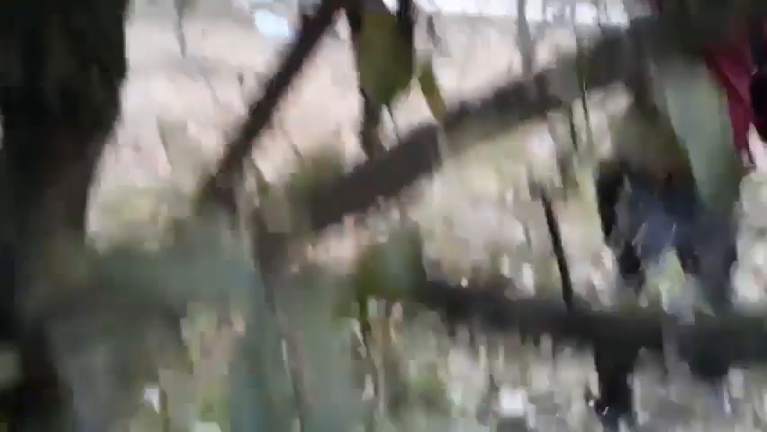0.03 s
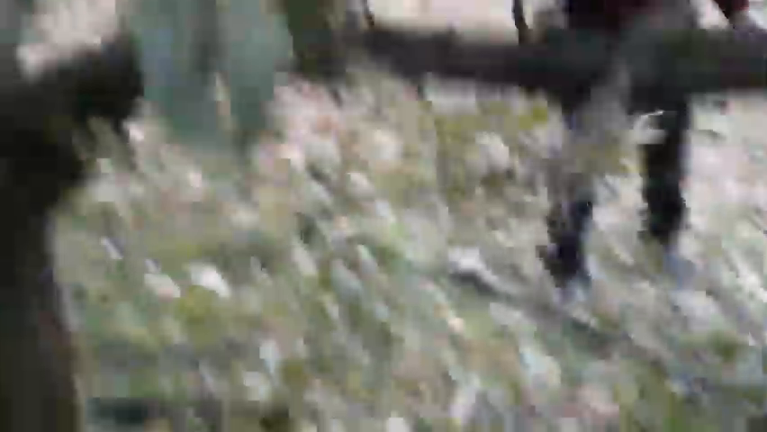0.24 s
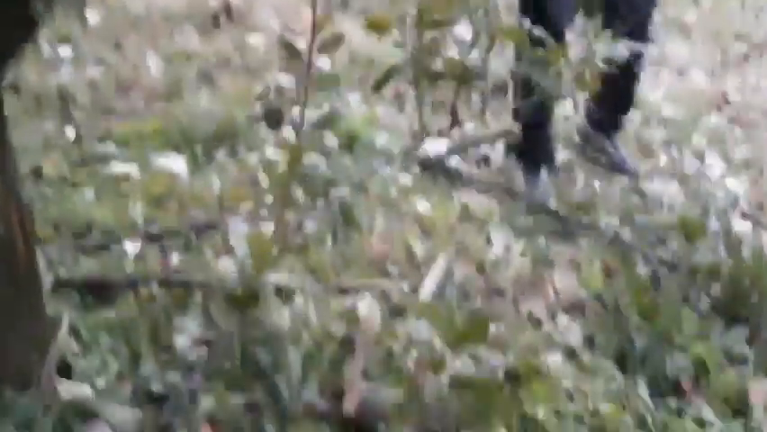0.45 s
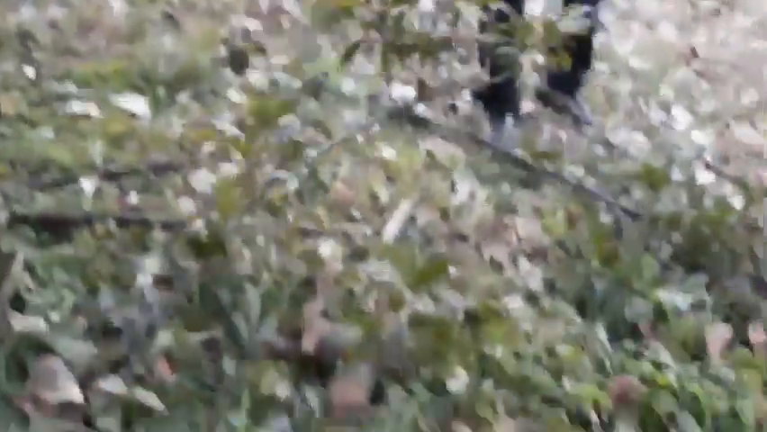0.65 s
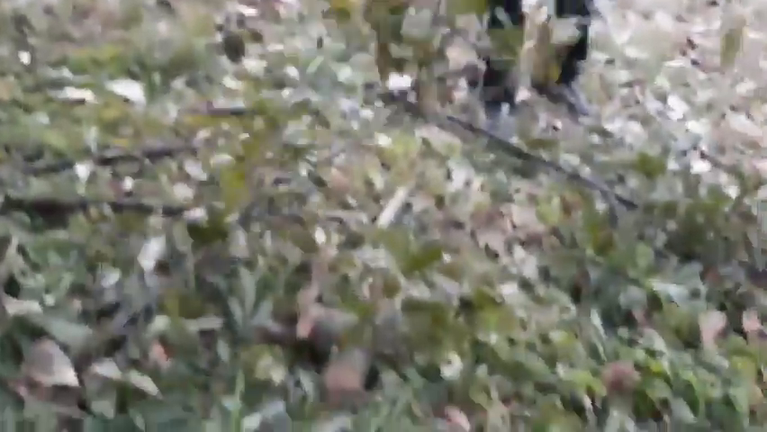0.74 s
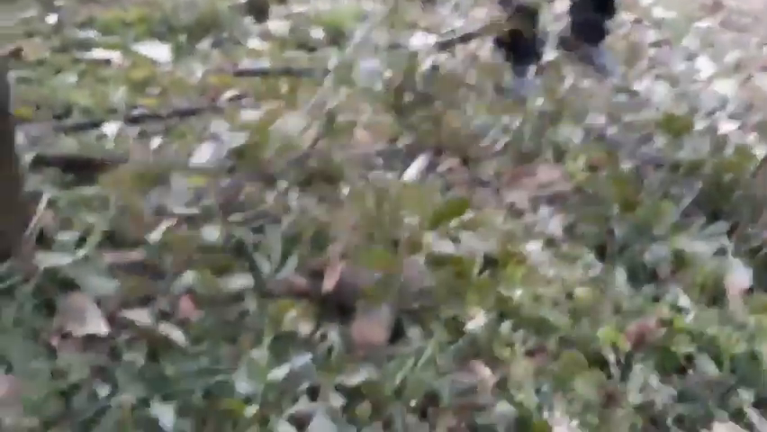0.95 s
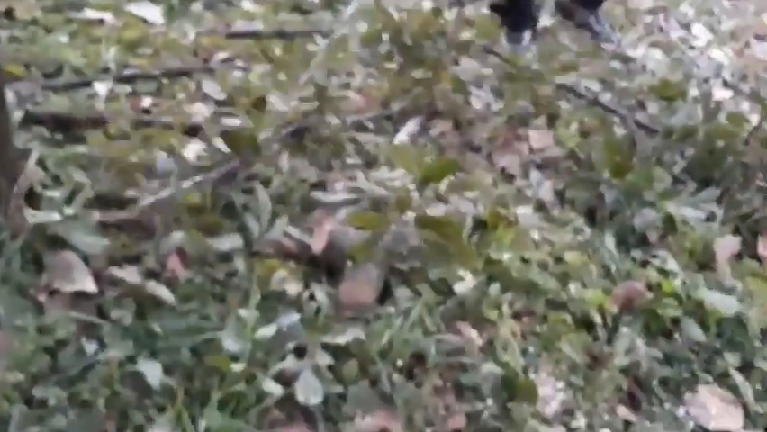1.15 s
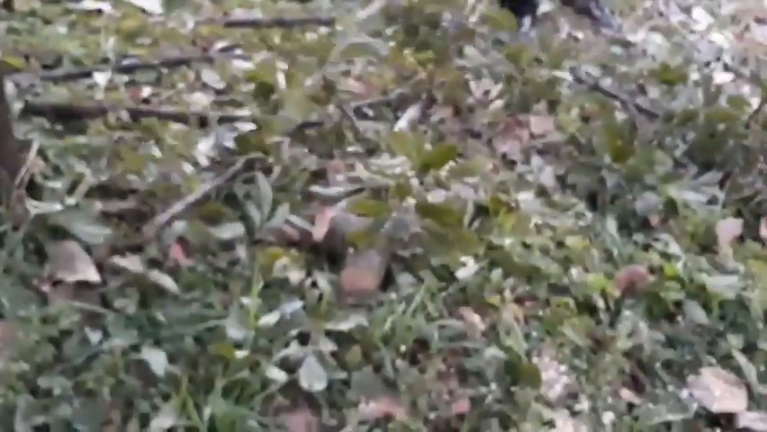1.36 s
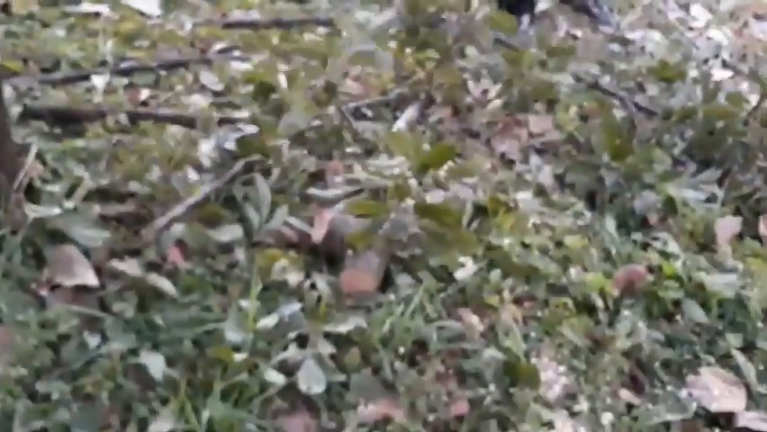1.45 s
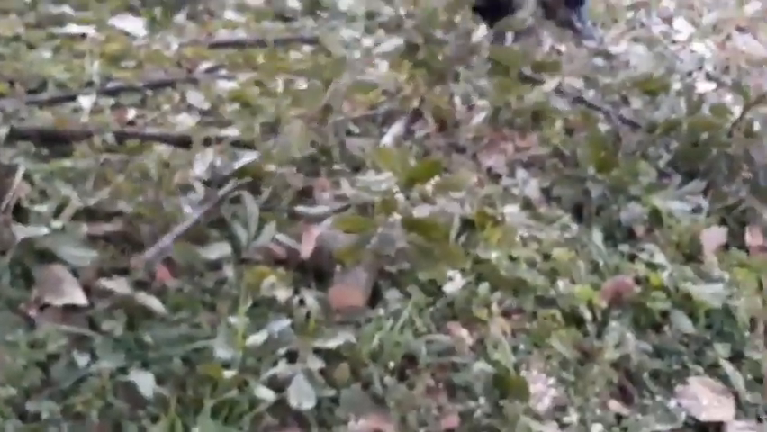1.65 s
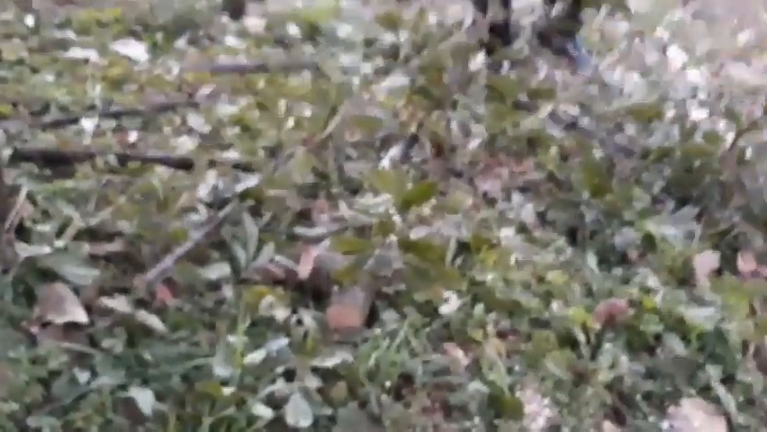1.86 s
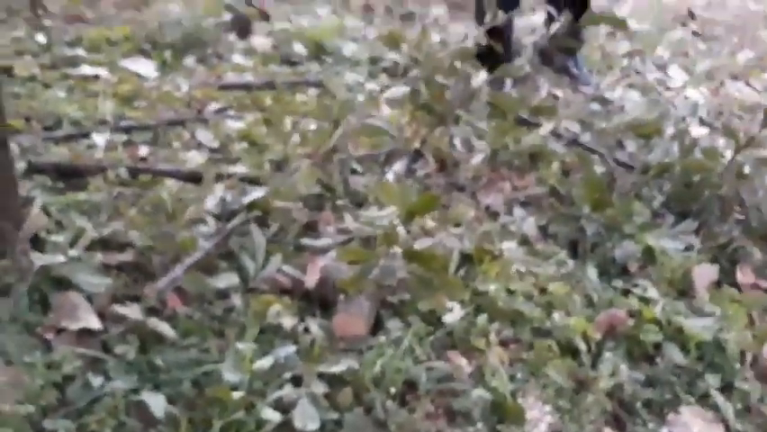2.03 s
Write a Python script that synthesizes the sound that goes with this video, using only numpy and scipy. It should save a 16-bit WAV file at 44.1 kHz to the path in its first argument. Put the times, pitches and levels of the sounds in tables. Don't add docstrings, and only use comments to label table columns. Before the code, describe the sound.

An electric chain saw clicks on, whines up, bites harshly through a branch, then winds down

```python
import sys
import numpy as np
from scipy import signal
from scipy.fft import rfft, irfft
from scipy.io import wavfile
from scipy.ndimage import uniform_filter1d

SR = 44100
rng = np.random.default_rng(int(sys.argv[2]) if len(sys.argv) > 2 else 0)


def gain_from_db(level_db):
    decades = np.asarray(level_db, float) / 20
    return 10 ** decades


def generate_wav(sig):
    pcm = np.round(np.clip(np.atleast_2d(sig).T, -1, 1) * 32767).astype(np.int16)
    wavfile.write(sys.argv[1], SR, pcm)


N = 92610
T = np.arange(N) / SR


def level(x, db):
    return x * gain_from_db(db) / np.sqrt(np.mean(x ** 2))


def band(x, hz, width_hz):
    return signal.lfilter(*signal.iirpeak(hz, hz / width_hz, SR), x)


def sharp_band(x, hz, width_hz):
    return band(band(x, hz, width_hz), hz, width_hz)


def colour(x, points):
    hz, db = np.array(points).T
    bins_hz = np.arange(1025) * SR / 2048
    log_gain = np.interp(np.log(bins_hz + 1), np.log(hz), db) * np.log(10) / 20
    cepstrum = irfft(log_gain)
    cepstrum[1:1024] *= 2
    cepstrum[1025:] = 0
    return signal.fftconvolve(x, irfft(np.exp(rfft(cepstrum))))[:N]


def walk(rate_hz):
    k = int(SR / rate_hz)
    steps = np.repeat(rng.standard_normal(N // k + 1), k)
    return 1.3 * uniform_filter1d(uniform_filter1d(steps, k), k)[:N]


def grit(per_s, scatter_db):
    hit = rng.random(N) < per_s / SR
    size = gain_from_db(scatter_db * np.minimum(rng.exponential(size=N), 2.5))
    clicks = hit * size * np.tanh(rng.standard_normal(N))
    return level(clicks + 0.5 * rng.standard_normal(N), 0)


def ring(at_s, db, hz, t60_s):
    age = np.maximum(T - at_s, 0)
    return gain_from_db(db - 60 * age / t60_s) * np.sin(2 * np.pi * hz * age)


# frequency in Hz, level in dB per Hz.
LEAF_SPECTRUM = [(18, -55), (40, -16), (110, -2), (400, -4), (1050, -11.5), (2500, -12.5), (4920, -4),
                 (15600, -19.5)]
# frequency in Hz, width in Hz, level in dB.
ENGINE_HUM = [(71, 18, -55), (87.2, 14, -54.5), (151.5, 17, -60.5), (210.7, 1.9, -58.5)]


def orchard():
    rustle = grit(per_s=3600, scatter_db=3) * gain_from_db(1.6 * walk(30))
    lowpass = signal.butter(2, 900, fs=SR, output="sos")
    low = signal.sosfilt(lowpass, rng.standard_normal(N) - rustle)
    early_db = 0.5 * np.exp(-(T / 0.062) ** 4)
    lull_db = 6 * np.exp(-((T - 0.11) / 0.018) ** 2)
    out = level(colour(rustle + low, LEAF_SPECTRUM), -42.5) * gain_from_db(early_db - lull_db)
    for hz, width_hz, db in ENGINE_HUM:
        tone = 0.051 * np.sin(2 * np.pi * hz * T)
        out = out + level(band(rng.standard_normal(N), hz, width_hz) + tone, db)
    return out


# start in seconds, peak in dB, frequency in Hz, t60 in seconds.
TWIG_SNAPS = [(.015, -32, 5500, .015), (.028, -33, 1500, .02), (.037, -31, 4500, .015),
              (.069, -31, 4900, .05), (.085, -34, 6500, .015), (.113, -33, 5500, .02),
              (.122, -31, 4800, .03), (.138, -33, 5500, .03), (1.905, -33, 6300, .02),
              (1.924, -31, 4950, .03), (2.014, -35, 5000, .02), (2.092, -38, 2000, .01),
              (2.022, -35, 6000, .04), (.884, -15, 1400, .04), (.963, -18, 1300, .03),
              (1.436, -11, 2600, .03)]
# start in seconds, peak in dB, frequency in Hz, t60 in seconds.
DULL_KNOCKS = [
    (0.058, -28, 880, 0.0087),
    (.05, -33.5, 380, 0.032),
    (.025, -37, 430, .04),
    (.146, -30, 640, 0.054),
    (.158, -31.5, 640, 0.26),
    (0.804, -30, 316.5, 0.022),
    (2.092, -27.5, 500, 0.015),
    (1.848, -31, 5700, .06),
]


def twigs():
    out = sum(ring(*row) for row in DULL_KNOCKS)
    for at_s, db, hz, t60_s in TWIG_SNAPS:
        push = rng.standard_normal(N) * (T >= at_s) * gain_from_db(-60 * np.maximum(T - at_s, 0) / t60_s)
        snap = band(push, hz, 0.5 * hz)
        out = out + gain_from_db(db) * snap / np.abs(snap).max()
    return out


# start in seconds, peak in dB, burst in seconds, pitch factor.
TRIGGER_CLACKS = [
    (.1457, -27, .003, .9),
    (.1498, -28, .004, 1.01),
    (.1578, -8, .0025, 1.01),
    (.1625, -13, .0015, .95),
    (.1655, -13, .002, 1.01),
    (.174, -16, .003, .97),
    (.1928, -16, .002, .9),
    (1.8324, -9, .0012, 1.02),
    (1.8357, -16, .0015, 1.08),
    (1.8378, -17, .002, .97),
]
# frequency in Hz, level in dB, t60 in seconds.
SWITCH_MODES = [(620, -13, .06), (1150, -10, .03), (2300, -2, .025), (1650, -7, .02), (3400, -3, .015),
                (4200, -4, .015), (5150, -4, .02), (6200, -6, .015), (7400, -19, .02)]
# start in seconds, level in dB, t60 in seconds.
SPRING_RINGS = [
    (.162, -36, .22),
    (1.834, -39, .1),
]


def trigger():
    spring_hz = 12780
    out = sum(ring(at_s, db, spring_hz, t60_s) for at_s, db, t60_s in SPRING_RINGS) * gain_from_db(3.5 * walk(90))
    for at_s, db, burst_s, pitch in TRIGGER_CLACKS:
        decay = (T >= at_s) * np.exp(-np.maximum(T - at_s, 0) / burst_s)
        attack = np.clip((T - at_s) / 0.0006, 0, 1)
        push = rng.standard_normal(N) * decay * attack
        clack = 0.01 * push
        for hz, mode_db, t60_s in SWITCH_MODES:
            mode = band(band(push, hz * pitch, 18 / t60_s), hz * pitch, 1500)
            clack = clack + gain_from_db(mode_db) * mode
        out = out + gain_from_db(db) * clack / np.abs(clack).max()
    return out


# multiple of tooth rate, dB over chain, wander in dB, change under bite in dB.
TOOTH_PARTIALS = [(1, -11, .8, -11), (2, -23, 1.5, -9), (3, -24.5, 1.8, 0), (4, -31, 4, 0), (5, -29, 4, 0),
                  (6, -25, 1.2, -5), (8, -28, 4, 0)]
# frequency in Hz, width in Hz, lift in dB.
HOUSING_LIFTS = [(670, 45, 5), (750, 30, -5), (1310, 90, 14), (1650, 80, 11), (1950, 160, 17),
                 (2400, 240, 16), (4920, 200, 10)]


def tooth_song(hz, phase, bite, whistle_db):
    overtone_share = np.clip((hz - 500) / 150, 0.25, 1)
    song = 0
    for k, db, wander_db, bite_db in TOOTH_PARTIALS:
        gain_db = db + wander_db * walk(44.97) + bite_db * bite
        for centre_hz, width_hz, lift_db in HOUSING_LIFTS:
            gain_db = gain_db + lift_db * np.exp(-((k * hz - centre_hz) / width_hz) ** 2)
        if k > 1:
            gain_db = gain_db + 3 * (T > 1.47)
        if k > 4:
            gain_db = gain_db + whistle_db
        share = np.clip((k * hz - 500) / 110, 0.1, 1)
        if k > 2:
            share = share * overtone_share
        song = song + np.sqrt(2) * share * gain_from_db(gain_db) * np.sin(k * phase + k * k)
    return song


# frequency in Hz, level in dB per Hz.
CHAIN_SPECTRUM = [(150, -55), (300, -39), (700, -10.5), (1100, -17), (1900, -3), (3100, -4.5), (7500, -3),
                  (15600, -17.5)]
# frequency in Hz, width in Hz, level in dB.
BAR_MODES = [(690, 48, -36), (2020, 160, -21.5), (2275, 1240, -22), (4024, 480, -16.5), (5010, 1860, -12),
             (7620, 130, -48)]


def chain_rattle(hz, phase):
    links = grit(per_s=5000, scatter_db=2.5) * (1 + 0.47 * np.cos(phase)) * gain_from_db(0.9 * walk(29.83))
    chain = level(colour(links, CHAIN_SPECTRUM), 0)
    for mode_hz, width_hz, db in BAR_MODES:
        chain = chain + level(sharp_band(links, mode_hz, width_hz), db)
    slow = np.clip(0.8 * (740 - hz) / 150, 0, 1)
    gaps = band(chain, 3150, 1100) + band(chain, 1300, 600)
    slow_rattle = 1.2 * sharp_band(chain, 2100, 800)
    return level(chain - slow * (gaps - slow_rattle), 0)


# frequency in Hz, level in dB per Hz.
CUT_SPECTRUM = [(150, -75), (280, -14.5), (590, -16.5), (950, -5), (2400, 5), (2800, -1), (7600, -1),
                (15600, -16)]
# frequency in Hz, width in Hz, level in dB.
WOOD_MODES = [(719, 96, -6.5), (1487, 156, -7.5), (2314, 210, -7), (2538, 320, -10), (3038, 170, -6),
              (4260, 67, -8.5), (6270, 440, -8)]


def wood_chips():
    cut_db, ring_db = -18.5, -8
    chips = grit(per_s=3400, scatter_db=5) * gain_from_db(1.3 * walk(45))
    wood = 0
    for hz, width_hz, db in WOOD_MODES:
        wood = wood + level(sharp_band(chips, hz, width_hz), db) * gain_from_db(1.8 * walk(35))
    return level(colour(chips, CUT_SPECTRUM), cut_db) + level(wood, cut_db + ring_db)


# time in seconds, chain level in dB, bite from 0 to about 1, slack-chain whistle in dB.
DRIVE_COURSE = [(0.16, -45, 0.31, -1), (0.201, -29.5, 0.19, -3), (0.281, -24.5, 0.26, 11),
                (0.413, -19.5, 0.15, 8), (0.472, -20.5, 0.1, 9), (.62, -21.5, 0.17, 6),
                (.79, -20.5, 0.28, -6), (0.861, -20, 0.73, -8), (0.939, -19.5, 0.49, -5),
                (1.032, -19, 1.05, -27), (1.201, -18, 0.8, -5), (1.447, -17.5, 1.01, -13),
                (1.469, -18.5, 0.25, 3), (1.61, -22, 0.24, 7), (1.692, -24.5, 0.22, -19),
                (1.78, -30.5, 0.2, -5), (1.83, -32, 0.15, -19), (1.855, -36.5, 0.04, 3)]
# time in seconds, tooth rate in Hz.
TOOTH_RATE = [(.158, 250), (.2, 355), (.245, 500), (.28, 578), (.415, 812), (.45, 818), (.57, 821),
              (.79, 819), (.83, 801), (.89, 797), (.94, 812), (1.02, 797), (1.13, 812), (1.27, 803),
              (1.33, 813), (1.43, 806), (1.462, 851), (1.62, 832), (1.69, 672), (1.78, 492), (1.855, 330)]


def saw():
    at_s, drive_db, drive_bite, drive_whistle_db = np.array(DRIVE_COURSE).T
    hz = np.interp(T, *np.array(TOOTH_RATE).T)
    chain_db = np.interp(T, at_s, drive_db)
    bite = np.maximum(np.interp(T, at_s, drive_bite), 0)
    whistle_db = np.interp(T, at_s, drive_whistle_db)
    wobble = 0.001662 * walk(25.4) + 0.008 * bite * walk(90)
    phase = 2 * np.pi * np.cumsum(hz * (1 + wobble)) / SR
    drive = chain_rattle(hz, phase) + tooth_song(hz, phase, bite, whistle_db)
    running = (T > at_s[0]) * gain_from_db(-900 * np.maximum(T - at_s[-1], 0))
    return running * (gain_from_db(chain_db) * drive + bite * wood_chips())


# start in seconds, peak in dB, frequency in Hz.
CUTTER_SNAGS = [(0.8864, -9, 2350), (0.916, -18, 2400), (0.9884, -12, 2330), (1.0418, -6.5, 2240),
                (1.1012, -12, 2190), (1.135, -9, 2372), (1.2373, -20, 2180), (1.2378, -12, 2370),
                (1.2593, -10, 2450), (1.3337, -13, 2350), (1.354, -10, 2500), (1.4088, -8, 2330)]
# middle in seconds, half length in seconds, level in dB.
BRANCH_SHAKES = [
    (.888, 0.019, -45.5),
    (0.971, .02, -41.5),
    (1.031, 0.043, -37.5),
    (1.11, 0.045, -46.5),
    (1.235, 0.024, -42.5),
    (1.33, 0.056, -46.5),
    (1.44, 0.028, -41.5),
]


def branch():
    swell = sum(gain_from_db(db) * np.exp(-((T - mid_s) / half_s) ** 2) for mid_s, half_s, db in BRANCH_SHAKES)
    phase = 2 * np.pi * np.cumsum(392.6 * (1 + 0.017 * walk(25.1))) / SR
    lowest = np.sqrt(2) * swell * np.sin(phase)
    upper = gain_from_db(6) * swell * level(band(rng.standard_normal(N), 708, 66), 0)
    snags = sum(ring(at_s, db - 2.5, hz, t60_s=0.024) for at_s, db, hz in CUTTER_SNAGS)
    return lowest + upper + snags


def scatter(near):
    echo_db, t60_s, gap_s = -20, 0.17, 0.004
    age = np.arange(SR // 4) / SR
    tail = rng.standard_normal(len(age)) * gain_from_db(-60 * age / t60_s) * (age > gap_s)
    tail = tail / np.sqrt(np.sum(tail ** 2))
    return gain_from_db(echo_db) * signal.fftconvolve(near, tail)[:N]


def scene():
    background = orchard()
    near = twigs() + trigger() + saw() + branch()
    mono = near + scatter(near) + background
    return np.array([mono, mono])


def top_cut(x):
    return signal.sosfilt(signal.butter(12, 15700, fs=SR, output="sos"), x)


# frequency in Hz, gain in dB.
MIC_RESPONSE = [(20, 0.5), (7600, 0.5), (8800, -4.5), (10000, -11), (11300, -4), (12700, 1.5), (14200, 0),
                (15800, -6.5)]


def record(dry):
    mono = np.tanh(0.6 * colour(dry[0], MIC_RESPONSE)) / 0.6
    mono = signal.sosfilt(signal.ellip(8, 0.3, 60, 15700, fs=SR, output="sos"), mono)
    highpass = signal.butter(4, 6500, "high", fs=SR, output="sos")
    treble = signal.sosfilt(highpass, np.roll(mono, 37))
    side = treble * gain_from_db(-39 + 10 * walk(20))
    return top_cut(np.array([mono + side, mono - side]))


dry = scene()
out = record(dry)
generate_wav(out)
```